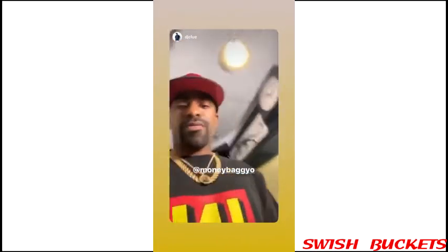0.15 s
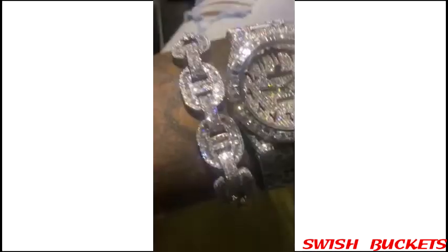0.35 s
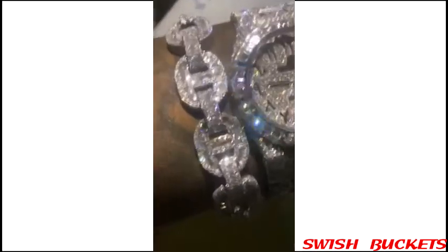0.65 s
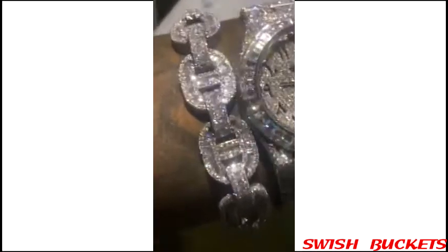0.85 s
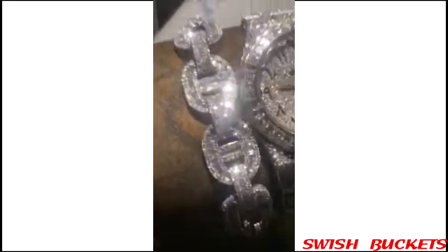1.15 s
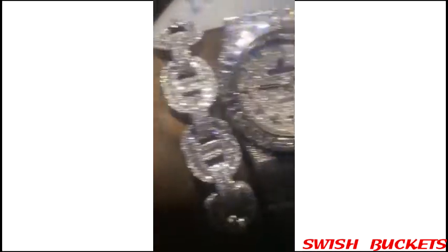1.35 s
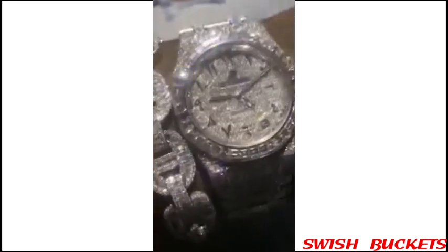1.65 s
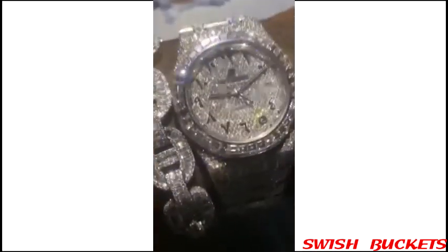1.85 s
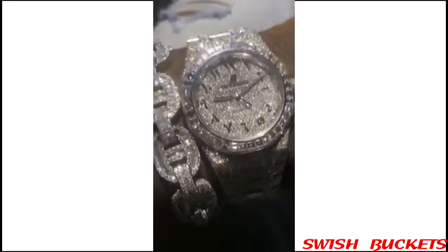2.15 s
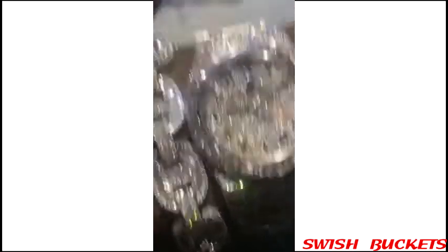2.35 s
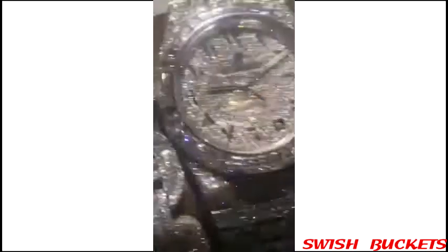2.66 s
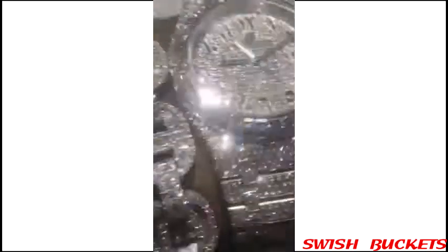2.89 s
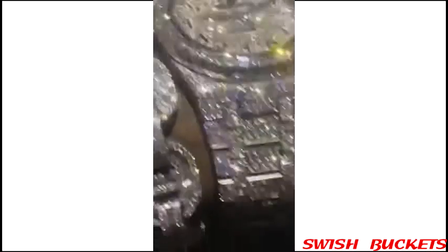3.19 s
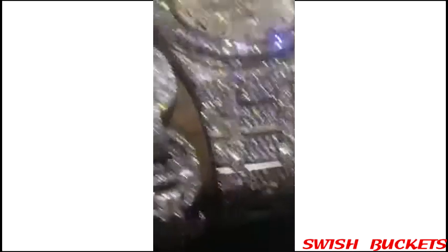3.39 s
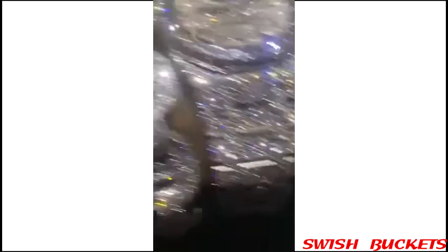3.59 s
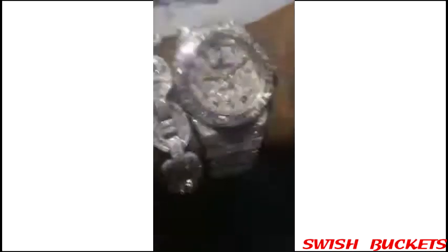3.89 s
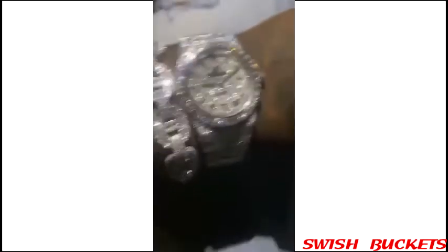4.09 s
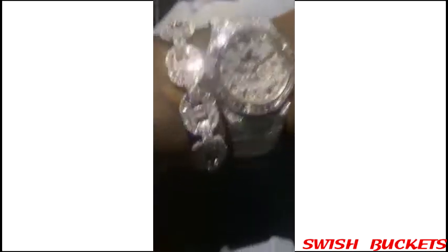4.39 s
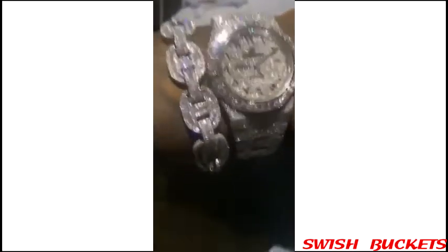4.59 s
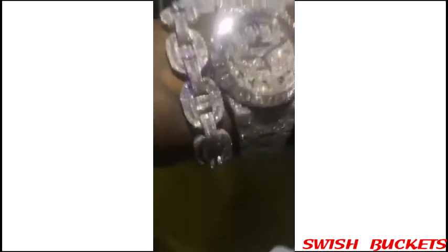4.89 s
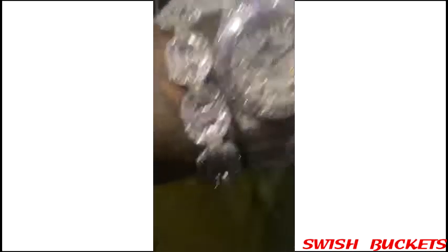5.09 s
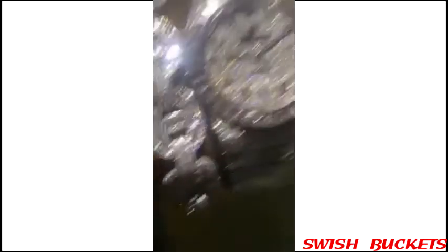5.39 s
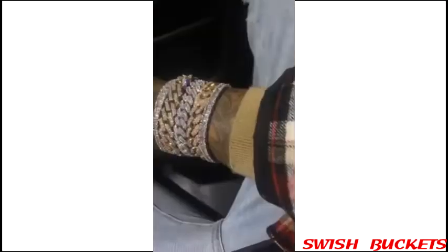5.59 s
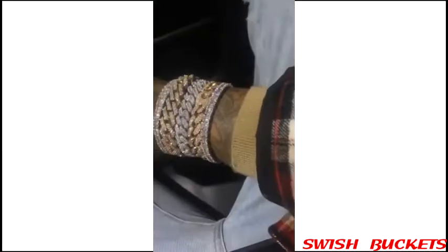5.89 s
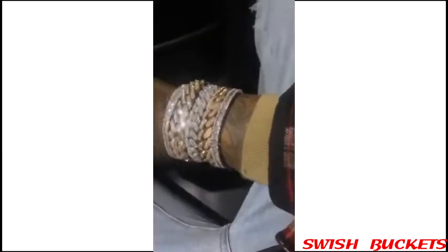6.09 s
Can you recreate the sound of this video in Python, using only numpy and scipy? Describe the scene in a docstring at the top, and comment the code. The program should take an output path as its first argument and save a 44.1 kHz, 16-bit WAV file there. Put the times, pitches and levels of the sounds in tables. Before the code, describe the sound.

Phone-captured car interior, dull and bass-heavy, with hard cuts. It opens on a moment of low room rumble, then silence. The cabin bursts in with a click; engine pitch rises, sinks, rises and sinks over steady road roar, while grainy handling scuffs, a low knock, short trim groans and small metal links sound close by. It clicks off into silence, then returns briefly with engine dropping, three scuffs and cloth rubbing.

```python
"""A brief end of a quieter room (soft rumble, one scuff) stops dead; after a short silence a click cuts into a moving car.
Shaped noise makes the bed of boom, roar, hiss and rustle; unsteady sines make an engine drone that climbs,
falls, climbs again and sinks, with lower tones swelling beneath. Grainy noise puffs scuff, short sines tick
and a band of noise brushes by as a sleeve; from 2 s resonant noise bumps, bent tones groan and metal links jingle.
A click and a second silence lead to a last moment in the car: the drone drops, with three scuffs and sleeve brushes."""
import sys
import numpy as np
from scipy import signal
from scipy.fft import rfft, irfft, next_fast_len
from scipy.io import wavfile
from scipy.ndimage import uniform_filter1d, map_coordinates

SR = 44100
rng = np.random.default_rng(int(sys.argv[2]) if len(sys.argv) > 2 else 0)


def pcm_store(signal):
    """Save signal as 16-bit PCM."""
    levels = np.round(np.clip(np.atleast_2d(signal), -1, 1) * 32767)
    wavfile.write(sys.argv[1], SR, levels.astype(np.int16).T)


N = 275625

# The three stretches of sound between silences. Each row: start in seconds, end in seconds.
STRETCHES = [(0, .279), (.4035, 5.4635), (5.5965, 6.25)]

# Bed levels, one row per stretch, before the level curves and crackle act.
# Each row: boom in dB, roar in dB, hiss in dB, rustle in dB.
BED_LEVELS = [(-41.5, -50, -64, -63.5), (-26, -35.5, -52, -60), (-26, -33.5, -49.5, -58)]
# Colour of the low boom. Each row: frequency in Hz, relative level in dB per Hz.
BOOM_SPECTRUM = [(14, -43.5), (24, -15), (36, -2.5), (76, 1), (99, -8), (106, -7), (114, -12), (129, -13),
                 (150, -13.5), (200, -36), (330, -120)]
# Colour of the roar, one list per stretch. Each row: frequency in Hz, relative level in dB per Hz.
ROAR_SPECTRA = [
    [(65, -32.5), (110, -14), (290, -2.5), (347, -11), (448, -8), (549, -16), (1400, -24), (1820, -37),
     (3080, -120)],
    [(65, -39.5), (110, -7), (135, -12.5), (247, -16.5), (275, -18.5), (333, -17), (537, -24), (651, -29.5),
     (724, -26), (1400, -40.5), (1820, -64), (3080, -120)],
    [(65, -32), (110, -11.5), (130, -12.5), (187, -18), (269, -16), (644, -31.5), (771, -31.5), (1400, -45),
     (1820, -57), (3080, -120)],
]
# Colour of the hiss, one list per stretch. Each row: frequency in Hz, relative level in dB per Hz.
HISS_SPECTRA = [
    [(590, -32), (1000, -18.5), (1700, -0.5), (2650, -8.5), (3500, -23), (4550, -14.5), (7700, -120)],
    [(590, -26), (1000, -6), (1320, -7), (1600, -10), (2270, -8.5), (3040, -17), (3500, -19.5),
     (4550, -29.5), (7700, -120)],
    [(590, -33), (1000, -6.5), (1250, -15), (1470, -10.5), (2160, -4.5), (3500, -14), (4550, -39),
     (7700, -120)],
]
# Colour of the rustle, one list per stretch. Each row: frequency in Hz, relative level in dB per Hz.
RUSTLE_SPECTRA = [
    [(1760, -27), (3000, 3.5), (3780, 1.5), (4130, 1), (5920, 2.5), (13900, -8)],
    [(1760, -18.5), (3000, -6), (4640, 1), (5840, -6), (8150, -11), (10500, -20), (12400, -19.5),
     (13900, -27)],
    [(1760, -24), (3000, -2.5), (3640, -4), (3930, -5.5), (5410, -12), (12400, -31), (13900, -36)],
]
# Level curve of the boom. Each row: time in seconds, level over the bed in dB.
BOOM_RIDE = [(0, -10), (.03, 3.5), (.28, -2.5), (.41, 1), (1, 3), (1.15, 0), (2.1, 1), (2.4, 2), (2.6, -2),
             (3.5, 2), (3.75, -0.5), (3.86, 2.5), (4.02, -2.5), (4.3, 0), (4.5, -0.5), (4.63, 2.5),
             (4.9, -2.5), (5.23, 1), (5.46, 1), (5.77, 2.5), (6.13, -0.5), (6.25, -2.5)]
# Shared level curve of roar, hiss and rustle. Each row: time in seconds, roar level over the bed in dB.
ROAR_HISS_RUSTLE_RIDE = [(0, 21.5), (.02, 10.5), (.05, 1.5), (.1, 2), (.28, -4), (.41, 0.5), (.45, 0.5),
                         (.49, 0), (.99, 0), (1.03, 3), (1.07, 0.5), (2.3, -.5), (3.5, 0.5), (3.62, 2.5),
                         (3.72, 0), (3.86, 3.5), (4.02, -0.5), (4.5, 1), (4.63, -0.5), (4.76, 1.5),
                         (5.35, 0), (5.46, 3.5), (5.6, 0), (5.77, 1.5), (5.8, -1), (6.25, 0.5)]
HISS_GROWS, RUSTLE_GROWS = 0.75, 0.63  # dB for each dB of the shared curve

# A sleeve brushing past. Each row: start in seconds, peak level in dB rms, length in seconds,
# band centre in Hz, band width in Hz.
SLEEVE_BRUSHES = [(0.407, -47, .055, 1800, 1200), (1.149, -59.5, .45, 2300, 900),
                  (5.61, -55.5, .2, 3630, 250), (5.88, -55, .2, 2690, 800), (6.06, -53.5, .19, 2400, 700)]
# Small metal contacts. Each row: start in seconds, peak level in dB, pitch in Hz, 60 dB decay in seconds.
METAL_TICKS = [(0.546, -35.5, 11400, 0.0044), (0.5505, -23, 750, 0.0055), (0.551, -26, 1700, 0.0044),
               (0.667, -26, 900, .008), (.823, -34.5, 1094, 0.026), (2.059, -19, 210, .04),
               (3.026, -37.5, 2040, 0.064), (3.029, -47, 9290, 0.011), (3.561, -41, 2000, .03),
               (3.622, -44, 2050, .05), (3.645, -44, 2270, .04), (3.765, -43, 4470, 0.021),
               (3.772, -49, 2230, .07), (3.872, -41, 4670, 0.014), (3.873, -41, 2130, .04),
               (4.8926, -35.5, 5250, .015), (5.4458, -29, 2040, 0.0056)]
# Modes of the metal links. Each row: frequency in Hz, width in Hz, relative level in dB.
LINK_MODES = [(2700, 40, -3), (3600, 45, -3), (3850, 150, -14), (4230, 80, -8), (4820, 35, -8),
              (5075, 70, -2), (5400, 200, -13)]
# Slides of the links. Each row: start in seconds, peak level in dB rms, length in seconds.
LINK_SLIDES = [(3.445, -64, 0.074), (3.543, -51, .07), (3.599, -52.5, .05), (3.633, -54, 0.066),
               (3.762, -58, 0.036), (4.88, -50.5, .04)]
# Modes of a trim panel before each bump scales them. Each row: frequency in Hz, width in Hz, relative level in dB.
PANEL_MODES = [(366, 25, .1), (460, 50, -6), (580, 60, -11), (716, 40, -12), (950, 150, -21),
               (1170, 150, -21)]
# Knocks on the panel. Each row: start in seconds, peak level in dB rms, length in seconds,
# factor on the mode frequencies, factor on the mode widths (damping).
PANEL_BUMPS = [(2.04, -31, 0.051, 0.514, 2), (3.55, -43, .04, 2.4, 4), (3.756, -39.5, 0.08, 1.209, 3),
               (3.828, -36, 0.065, 1.41, 3), (4.14, -37.5, .06, 1.15, 3), (4.164, -43, .05, 2.26, 2.5),
               (4.404, -43.5, .06, 2.3, 4.9), (4.502, -40, .05, 1.05, 3.1), (4.75, -39.5, 0.04, 1.91, 3.7)]
# Panel modes that sing and bend. Each row: start in seconds, length in seconds, first pitch in Hz,
# last pitch in Hz, peak level in dB rms.
PANEL_GROANS = [(3.762, .075, 400, 350, -34.5), (3.4, 0.047, 345, 400, -36), (3.77, .065, 600, 590, -43.5),
                (3.765, .05, 1200, 1150, -50), (3.835, .055, 500, 510, -43.5), (4.14, .03, 670, 590, -41),
                (2.9, 0.062, 780, 650, -45), (4.142, 0.045, 385, 397, -34), (4.15, 0.085, 490, 480, -39.5)]
# Short noise puffs, with sharp clicks where the sound cuts in at 0.404 s and out at 5.462 s.
# Each row: start in seconds, peak level in dB rms, tilt in dB per octave (held within 9), 60 dB decay in seconds.
SCUFF_PUFFS = [(0.159, -50.5, -1.5, 0.076), (0.4038, -34, -5, 0.008), (0.413, -30, 5.5, 0.005),
               (.42, -43, -10.5, 0.09), (0.452, -40, -8, 0.043), (0.6734, -40.5, -7.5, .04),
               (0.756, -43, -8, .05), (0.87, -48.5, -7.5, .03), (1.0242, -39.5, -13, 0.069),
               (1.11, -43.5, -8.5, 0.043), (1.198, -53, -8.5, 0.025), (1.527, -45.5, -6, .04),
               (1.774, -46, -6.5, .05), (1.9557, -52.5, -5.5, .04), (1.997, -48.5, -3, .03),
               (2.042, -43.5, -3.5, 0.045), (2.2651, -48.5, -6.5, .02), (2.367, -40.5, -9, 0.071),
               (2.3982, -42, -3.5, 0.028), (2.4126, -39, -4.5, .025), (2.4513, -44, -7, 0.023),
               (2.612, -50.5, -3, .04), (2.958, -45, -7.5, 0.043), (3.023, -47.5, -5, 0.056),
               (3.175, -44.5, -7.5, 0.071), (3.281, -46, -6, 0.041), (3.361, -46.5, -6, 0.033),
               (3.39, -53.5, 1.5, .05), (3.763, -56.5, -4, 0.036), (4.099, -48, -5, .04),
               (4.144, -46, -9, .02), (4.373, -49.5, -3.5, .02), (4.3975, -40.5, -7.5, 0.033),
               (4.459, -41, -8.5, 0.035), (4.5058, -38.5, -9, 0.032), (4.532, -44, -6, 0.085),
               (4.708, -45, -5.5, .02), (4.769, -41.5, -8, .04), (4.869, -45.5, -6, 0.071),
               (4.892, -48.5, -1.5, .05), (5.113, -49, 2, .015), (5.146, -41.5, -6, 0.032),
               (5.44, -44.5, -1, 0.035), (5.4464, -33, -8.5, 0.011), (5.4625, -27, -8, 0.0082),
               (5.7175, -41, -11, 0.056), (5.885, -39, -0.5, 0.058), (6.086, -46, -5.5, .05)]
# Lower driveline tones. Each row: start in seconds, length in seconds, first pitch in Hz, last pitch in Hz,
# peak level in dB rms.
DRIVELINE_SWELLS = [(0.42, 0.49, 38.1, 40, -31), (0.7, .3, 39.9, 51.8, -27), (0.844, 0.33, 64.5, 64.2, -25),
                    (1.144, 0.84, 59.8, 49.6, -37), (3.298, 0.33, 31.07, 39.3, -27),
                    (4.17, 0.33, 41, 39, -26), (4.5, 0.29, 39, 36.8, -28.5), (4.167, 0.19, 73, 72, -23),
                    (4.65, 0.3, 74.24, 73, -31), (5.05, 0.37, 70, 74.8, -33),
                    (5.596, 0.22, 35.77, 37.3, -33)]
# Engine drone, one list per unbroken glide. Each row: time in seconds, pitch in Hz, level in dB rms.
ENGINE_GLIDES = [
    [(.42, 75.97, -31), (.63, 79.5, -25.5), (.82, 85.7, -33.5)],
    [(1.05, 107.7, -31), (1.31, 95.14, -23), (1.68, 88.75, -23.5), (2.0, 85.3, -26), (2.2, 82.14, -31.5),
     (2.45, 79.4, -23.5), (2.8, 82.1, -26.5), (2.97, 87.85, -24), (3.08, 95.7, -27.5), (3.29, 100.6, -24),
     (3.5, 97.9, -25), (3.87, 87.6, -31.5)],
    [(4.2, 92.3, -33), (4.6, 90.44, -31), (4.96, 89.2, -35), (5.4, 87.3, -35)],
    [(5.61, 101.6, -26), (5.9, 99.45, -24), (6.05, 93.3, -23.5), (6.24, 79.5, -29)],
]

TOP_HZ = 14100  # band limit of the phone


def amp(db):
    """Decibels to gain."""
    return 10 ** (np.asarray(db) / 20)


def unit(x):
    """Scales a sound to rms 1."""
    return x / np.sqrt(np.mean(x ** 2) + 1e-20)


def along(points, hz):
    """Reads a curve of (Hz, value) points on a log frequency axis."""
    point_hz, values = np.transpose(points)
    return np.interp(np.log(hz + 1), np.log(point_hz + 1), values)


def curves(rows):
    """One value per sample for each column after the time."""
    s, *columns = np.transpose(rows)
    return [np.interp(np.arange(N) / SR, s, column) for column in columns]


def wobble(rate):
    """A smooth random curve with `rate` knots a second."""
    knots = rng.standard_normal(int(N * rate / SR) + 4)
    return map_coordinates(knots, [np.arange(N) * rate / SR])


def filtered(x, response):
    """Shapes a sound with a response over frequency."""
    m = next_fast_len(len(x) + 8192)
    return irfft(rfft(x, m) * response(np.fft.rfftfreq(m, 1 / SR)), m)[:len(x)]


def add(track, s, sound):
    """Mixes a sound in at a time in seconds."""
    part = track[round(s * SR):][:len(sound)]
    part += sound[:len(part)]


def rush(spectrum, patchy_db):
    """Coloured noise of rms 1, its gain varying in patches over time and frequency."""
    grid = signal.stft(rng.standard_normal(N), nperseg=512)[2]
    patches = uniform_filter1d(rng.standard_normal(grid.shape), size=8, axis=0)  # blur across frequency
    patches = uniform_filter1d(patches, size=5, axis=1)  # blur across time
    noise = signal.istft(grid * amp(patchy_db * unit(patches)), nperseg=512)[1][:N]
    return unit(filtered(noise, lambda hz: amp(along(spectrum, hz))))


def crackle(per_s, size_db, t60):
    """A gain curve of tiny random jolts: sudden rises that die quickly."""
    jolts = (rng.random(N) < per_s / SR) * amp(size_db * rng.exponential(size=N))
    return 1 + signal.lfilter([1], [1, -amp(-60 / (t60 * SR))], jolts)


def swell(modes, db, length):
    """Noise excites resonances under one smooth rise and slightly longer fall."""
    u = np.linspace(0, 1, max(round(length * SR), 64))

    def body(f):
        response = 0
        for k, (centre, width, level_db) in enumerate(modes):
            damping = 1j * f * width
            # neighbouring modes have opposite sign
            response = response + (-1) ** k * amp(level_db) * damping / (centre ** 2 - f ** 2 + damping)
        return response

    noise = filtered(rng.standard_normal(SR // 2), body)[-len(u):]  # the tail has rung up
    return amp(db) * np.sin(np.pi * u ** 0.79) * unit(noise)


def tone(hz, gain):
    """A sine of about the given rms gain, slightly unsteady in phase and level."""
    phase = 2 * np.pi * np.cumsum(hz) / SR + 0.1 * wobble(12)
    return gain * amp(0.47 * wobble(12)) * np.sqrt(2) * np.sin(phase)


def glides(rows):
    """Tones that swell and sink while their pitch slides."""
    out, t = np.zeros(N), np.arange(N) / SR
    for s, length, first_hz, last_hz, db in rows:
        u = np.clip((t - s) / length, 0, 1)
        rise_and_fall = np.abs(np.sin(np.pi * u)) ** 0.68
        out += tone(first_hz + (last_hz - first_hz) * u, amp(db) * rise_and_fall)
    return out


def background(stretch):
    """Bed of each stretch, room or car: low boom, and one shared level curve moves roar, hiss and rustle."""
    boom_db, roar_db, hiss_db, rustle_db = BED_LEVELS[stretch]
    (shared_db,), (boom_ride_db,) = curves(ROAR_HISS_RUSTLE_RIDE), curves(BOOM_RIDE)
    flutter = wobble(21.98)
    crackling = crackle(per_s=70, size_db=2.5, t60=0.02)

    boom_gain = amp(boom_db + boom_ride_db + 0.57 * wobble(8.2))
    roar_gain = amp(roar_db + shared_db + 0.44 * flutter)
    hiss_gain = amp(hiss_db + HISS_GROWS * shared_db + 0.43 * flutter) * crackling ** 0.33
    rustle_gain = amp(rustle_db + RUSTLE_GROWS * shared_db + 1.3 * flutter) * crackling ** 0.49

    boom = boom_gain * rush(BOOM_SPECTRUM, patchy_db=0.5)
    roar = roar_gain * rush(ROAR_SPECTRA[stretch], patchy_db=0.43)
    hiss = hiss_gain * rush(HISS_SPECTRA[stretch], patchy_db=1.55)
    rustle = rustle_gain * rush(RUSTLE_SPECTRA[stretch], patchy_db=1.95)
    return boom + roar + hiss + rustle


def sleeve():
    """Cloth drags by as a soft band of hiss."""
    out = np.zeros(N)
    for s, db, length, hz, width in SLEEVE_BRUSHES:
        add(out, s, swell([(hz, width, 0)], db, length))
    return out


def jingle():
    """Metal links at the wrist slide over each other and sing in their modes."""
    out = np.zeros(N)
    for s, db, length in LINK_SLIDES:
        add(out, s, swell(LINK_MODES, db, length))
    return out


def ticks():
    """Small loose metal parts touch: one short damped sine each."""
    out, t = np.zeros(N), np.arange(SR // 10) / SR
    attack = 1 - np.exp(-t / 0.0003)
    for s, db, hz, t60 in METAL_TICKS:
        add(out, s, amp(db - 60 * t / t60) * attack * np.sin(2 * np.pi * hz * t))
    return out


def bumps():
    """Road joints shake a trim panel for a moment; single modes groan as bending tones."""
    out = glides(PANEL_GROANS)
    for s, db, length, pitch_factor, damping_factor in PANEL_BUMPS:
        modes = [(hz * pitch_factor, width * damping_factor, level) for hz, width, level in PANEL_MODES]
        add(out, s, swell(modes, db, length))
    return out


def scuffs_and_clicks():
    """Short grainy noise puffs, each with its own brightness, and sharp clicks at the cuts in and out."""
    out, t = np.zeros(N), np.arange(SR // 4) / SR
    attack = 1 - np.exp(-t / 0.00033)
    for s, db, tilt_db, t60 in SCUFF_PUFFS:
        tilt_db = np.clip(tilt_db, -9, 9)

        def colour(hz):
            band = hz ** 2 / (hz ** 2 + 1500 ** 2) / (1 + (hz / 9000) ** 4)
            return amp(tilt_db * np.log2(hz / 6000 + 0.012)) * band

        grains = amp(4.8 * rng.standard_normal(len(t)))  # a random gain on every sample
        grit = filtered(rng.standard_normal(len(t)) * grains, colour)
        add(out, s, amp(db - 60 * t / t60) * attack * unit(grit))
    return out


def engine():
    """The firing order glides with the revs; lower driveline tones swell and sink now and then."""
    out, t = glides(DRIVELINE_SWELLS), np.arange(N) / SR
    for rows in ENGINE_GLIDES:
        hz, db = curves(rows)
        inside = np.minimum(t - rows[0][0], rows[-1][0] - t)  # seconds, negative outside the glide
        fade = np.clip(inside / 0.069 + 1, 0, 1)  # 69 ms before the first row and after the last
        out += tone(hz, amp(db) * fade)
    return out


def scene():
    """Each stretch starts and stops abruptly, with silence between."""
    t = np.arange(N) / SR
    near = sleeve() + jingle() + ticks() + bumps() + scuffs_and_clicks() + engine()
    out = np.zeros(N)
    for stretch, (s, end) in enumerate(STRETCHES):
        gate = np.clip((t - s) / 0.00042, 0, 1) * (t < end)  # 0.42 ms rise, hard stop
        out += gate * (background(stretch) + near)
    return out[None]


def record(dry):
    """The phone keeps nothing above its band limit."""
    return filtered(dry[0], lambda hz: hz < TOP_HZ)[None]


dry = scene()
out = record(dry)
pcm_store(out)
```